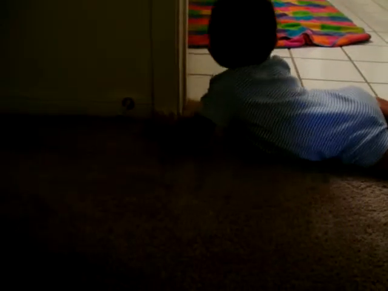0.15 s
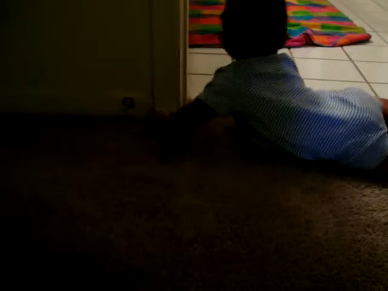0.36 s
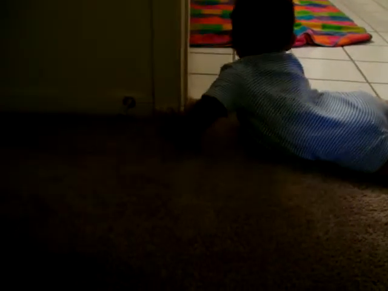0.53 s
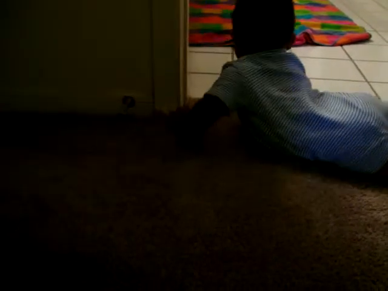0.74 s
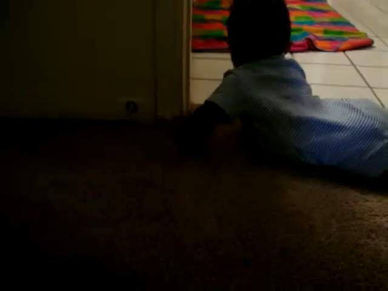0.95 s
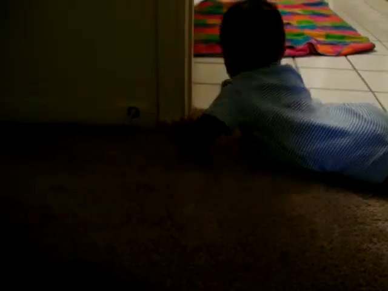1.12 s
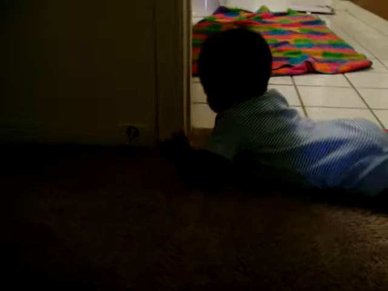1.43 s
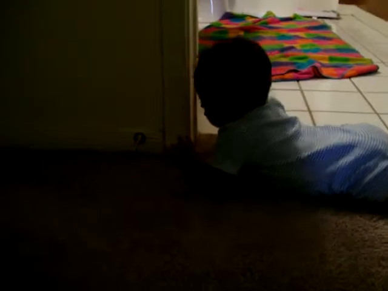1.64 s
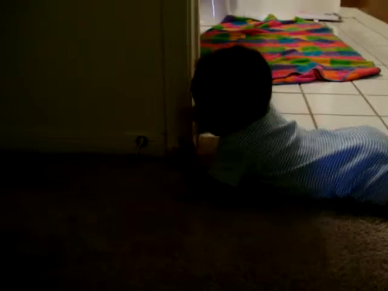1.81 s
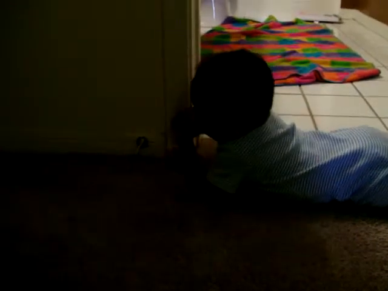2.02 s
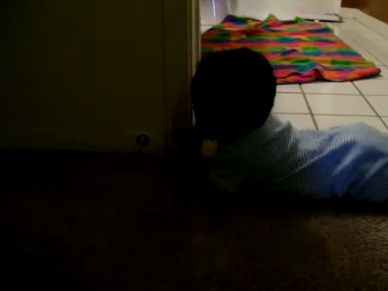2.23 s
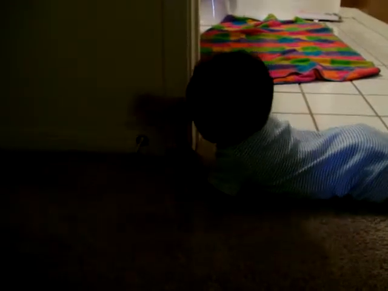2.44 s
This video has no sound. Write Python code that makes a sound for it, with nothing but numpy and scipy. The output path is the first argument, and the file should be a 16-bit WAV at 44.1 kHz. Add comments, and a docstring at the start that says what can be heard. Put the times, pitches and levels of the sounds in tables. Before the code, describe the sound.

A spring door stopper twangs from the start, pulsing rapidly with buzzing, chattering coils. It fades to its quietest around 1.3 seconds, where a soft cloth-like rustle passes. From 1.6 seconds the twang swells again, with hollow taps near 2 seconds. At 2.5 seconds a hand claps against the spring and the coils rattle briefly. Low hum, a thin whine and hiss fill the quiet room throughout.

```python
"""A twang: a coiled spring door stopper swings about 18 times a second in a quiet room. On each swing
its coils knock, rebound, slide and chatter, ringing spring and door. The twang fades, a soft rustle
passes, and the twang swells again as the swing turns to another plane; the hardest knocks ring the
base plate. A hand claps against the spring and the coils rattle. Mains hum, a thin whine and hiss
lie underneath."""
import sys
import numpy as np
from scipy import signal
from scipy.fft import rfft, irfft, next_fast_len
from scipy.io import wavfile

SR = 44100
rng = np.random.default_rng(int(sys.argv[2]) if len(sys.argv) > 2 else 0)


def pcm_store(signal):
    """Save signal as 16-bit PCM."""
    levels = np.round(np.clip(np.atleast_2d(signal), -1, 1) * 32767)
    wavfile.write(sys.argv[1], SR, levels.astype(np.int16).T)


N = 113337

# swing rate (time [s], rate [Hz])
SWING_RATE = [(0, 18.55), (.4, 18.55), (.7, 18.5), (1.0, 18.4), (1.3, 18.4), (1.6, 18.55), (1.85, 18.66),
              (2.05, 18.8), (2.45, 18.95)]
FIRST_KNOCK_S, TURN_MID_S, TURN_LENGTH_S, CAUGHT_S = .0455, 1.416, .24, 2.49
# swing strength (time [s], low modes [dB], upper modes [dB], chatter [dB])
SWING_LEVELS = [(0.0, -31.5, -35, -45), (0.15, -35, -38, -47.5), (0.33, -33, -36.5, -49.5),
                (0.6, -39.5, -45.5, -54), (0.9, -42.5, -48.5, -54), (1.3, -49, -56, -53.5),
                (1.52, -47.5, -53, -58), (1.72, -40, -44, -56.5), (1.95, -34, -37.5, -49.5),
                (2.15, -31, -37, -51.5), (2.43, -33.7, -39.5, -61.5)]
# coil contacts in one swing, per plane (delay [s], low-mode drive [dB], upper-mode drive [dB])
FIRST_CONTACTS = [(-0.00381, 8.0, 5.1), (0.00165, 0.4, 6.4), (0.00972, -25.0, 2.7), (0.01382, -25.0, -2.3),
                  (0.02219, -0.1, -6.4), (0.03944, 3.3, -23.7)]
SECOND_CONTACTS = [(-0.00218, 7.2, 5.1), (0.00365, 5.0, 4.2), (0.0083, -1.4, -3.4), (0.01193, -1.5, -6.4),
                   (0.02478, -13.6, -11.4), (0.04153, 0.8, -7.2)]
# spring and door modes, per plane and band (frequency [Hz], t60 [s], weight [dB])
FIRST_LOW_MODES = [(219, 0.198, -3.0), (317, 0.113, 0.3), (359, 0.333, -0.7), (388, 0.333, 0.9),
                   (454, 0.116, -0.9)]
FIRST_UPPER_MODES = [(655, 0.128, -2.9), (782, 0.146, 0.5), (826, 0.333, 10.6), (913, 0.024, -16.1),
                     (1002, 0.081, -7.7), (1169, 0.331, 1.7), (1340, 0.105, -10.8), (1548, 0.333, -11.4),
                     (1666, 0.148, -17.1)]
SECOND_LOW_MODES = [(226, 0.035, -9.8), (321, 0.13, -2.4), (357, 0.333, -1.0), (396, 0.333, 10.4),
                    (451, 0.285, -12.2)]
SECOND_UPPER_MODES = [(598, 0.125, -2.2), (734, 0.139, 2.1), (802, 0.072, 1.0), (919, 0.018, -11.1),
                      (939, 0.107, 3.0), (1072, 0.02, -11.4), (1347, 0.036, -15.0), (1642, 0.018, -11.3),
                      (1657, 0.041, -8.7)]
# sliding coils (frequency [Hz], level [dB])
RASP_SPECTRUM = [(120, -25), (220, -12), (480, -7), (620, -2), (800, 0.5), (1100, 0.5), (1500, -5),
                 (2000, -14), (3800, -13), (5000, -20.5), (10000, -46)]

# far end of the swing (time [s], delay after knock [s])
FAR_END_DELAY = [(0, 0.025), (.8, 0.027), (1.35, 0.021), (1.6, .0218), (1.95, .0198), (2.2, 0.018)]
# coil ticks around the far end (delay [s], first plane [dB], second plane [dB])
CHATTER_TICKS = [(-.027, -11.5, -12.5), (-.018, -6, -4.5), (-.009, -7, -10), (0, 1.5, 1), (.009, -6.5, -18),
                 (.018, -8.5, -11.5)]
# wire ring in a tick (frequency [Hz], t60 [s], level [dB])
WIRE_MODES = [(2394, 0.02, -1.5), (2517, 0.026, -0.5), (2787, 0.026, 4), (2883, 0.024, 1.5),
              (3186, 0.028, -6), (3437, 0.015, -4), (3908, 0.031, -5.5), (4030, 0.041, -3.5),
              (7420, 0.032, -11)]
# scrape in a tick (frequency [Hz], level [dB])
SCRAPE_SPECTRUM = [(300, -48), (900, -15), (1600, -2), (2000, -18), (3500, 5), (4300, -17), (5000, -10),
                   (10000, -21)]

# mains hum and a faint high tone (frequency [Hz], rms level [dB])
STEADY_TONES = [(120, -44.5), (7864, -61.5)]
# room rumble and hiss (frequency [Hz], level [dB])
HISS_SPECTRUM = [(25, -18), (45, -16.5), (65, -16.5), (100, -11), (167, -14), (449, -11.5), (565, -21.5),
                 (817, -17.5), (1450, -27), (2770, -31), (5150, -35.5), (7400, -34), (8350, -36.5),
                 (11000, -38.5)]
# rustle in the lull (frequency [Hz], level [dB])
RUSTLE_SPECTRUM = [(200, -2), (800, 6), (1500, -3), (2300, 3), (3200, -4), (5000, -10), (10000, -26)]
# base plate ring (frequency [Hz], t60 [s], level [dB])
PLATE_MODES = [(852, 0.029, 0), (1040, 0.019, -20), (1340, 0.075, -11), (1740, 0.03, -14)]

# hand blows (time [s], thud [dB], crack [dB])
HAND_BLOWS = [(2.4945, -16, -45), (2.497, -18.5, -33), (2.499, -41, -21.5), (2.507, -18, -30),
              (2.516, -21, -38), (2.5225, -22, -42), (2.5425, -28, -45)]
# thud of a blow (frequency [Hz], t60 [s], level [dB])
THUD_MODES = [(749, 0.047, -3.5), (832, 0.019, 9.5), (960, 0.024, -6), (1316, 0.025, -14.5),
              (1623, 0.03, -15.5)]
# crack of a blow (frequency [Hz], level [dB])
CRACK_SPECTRUM = [(100, -20), (300, 6), (1200, 4.5), (2000, -13), (2900, -0.5), (4200, -12), (6000, -22),
                  (7600, -4.5), (8500, -12), (10500, -28)]
# caught coils (frequency [Hz], level [dB])
RATTLE_SPECTRUM = [(500, -20), (1400, 3), (2000, -7), (3200, 1.5), (4500, -9.5), (6000, -19), (10000, -30)]
# recorder treble response (frequency [Hz], gain [dB])
TREBLE_ROLL_OFF = [(10000, -0.5), (10800, -3.5), (11400, -9.5), (11900, -20)]


def amp(db):
    """Decibels to gain."""
    return 10 ** (np.asarray(db) / 20)


def unit(x):
    """Scale to rms 1."""
    return x / np.sqrt(np.mean(x ** 2) + 1e-20)


def clock(length_s=None):
    """Sample times [s]; whole scene by default."""
    return np.arange(N if length_s is None else int(length_s * SR)) / SR


def curve(rows, t, column=1):
    """One table column, interpolated at times t."""
    rows = np.array(rows)
    return np.interp(t, rows[:, 0], rows[:, column])


def coloured(x, spectrum, top_hz=SR):
    """Filter by (frequency [Hz], gain [dB]) points on a log axis."""
    size = next_fast_len(len(x) + 8192)
    bins_hz = np.fft.rfftfreq(size, 1 / SR)
    hz, db = np.transpose(spectrum)
    gain = amp(np.interp(np.log(bins_hz + 1), np.log(hz + 1), db)) * (bins_hz < top_hz)
    return irfft(rfft(x, size) * gain, size)[:len(x)]


def noise(spectrum, samples=N):
    """Coloured noise, rms 1."""
    return unit(coloured(rng.standard_normal(samples), spectrum))


def burst(spectrum, t60_s):
    """Decaying puff of coloured noise."""
    t = clock(.5)
    return noise(spectrum, len(t)) * amp(-60 * t / t60_s)


def ringing(modes):
    """Sum of damped sines."""
    t = clock(.5)
    return sum(amp(db - 60 * t / t60_s) * np.sin(2 * np.pi * hz * t) for hz, t60_s, db in modes)


def strike(times_s, gains, response):
    """Play a response at each time, from -1 s on."""
    at = np.round((np.ravel(times_s) + 1) * SR).astype(int)
    impulses = np.bincount(at, np.ravel(gains), N + SR)
    return signal.fftconvolve(impulses, response)[SR:SR + N]


def swings():
    """Time of each swing and its share in each plane; the swing turns through a right angle."""
    t = clock(3) - .25
    cycles = np.cumsum(curve(SWING_RATE, t)) / SR
    cycles -= np.interp(FIRST_KNOCK_S, t, cycles)
    times_s = np.interp(np.arange(np.ceil(cycles[0]), cycles[-1]), cycles, t)
    times_s = times_s[times_s < CAUGHT_S]
    angle_rad = np.clip((times_s - TURN_MID_S) / TURN_LENGTH_S + .5, 0, 1) * np.pi / 2
    return times_s, np.array([np.cos(angle_rad), np.sin(angle_rad)])


def spring_ring(modes):
    """Spring and door after one knock; neighbouring modes move in opposite directions."""
    t = clock(.5)
    ring = sum((-1) ** k * amp(db - 60 * t / t60_s) / t60_s * np.cos(2 * np.pi * hz * t)
               for k, (hz, t60_s, db) in enumerate(modes))
    return ring * np.where(t > 0, 1, .5)


def twang(times_s, shares, trim_db=-2, scatter_db=.6, lull_s=1, lull_width_s=.51):
    """Each swing knocks and rebounds, ringing the low and upper modes of its plane."""
    out = np.zeros(N)
    lull = amp(-4) * np.exp(-((times_s - lull_s) / lull_width_s) ** 2)
    planes = ((FIRST_CONTACTS, FIRST_LOW_MODES, FIRST_UPPER_MODES),
              (SECOND_CONTACTS, SECOND_LOW_MODES, SECOND_UPPER_MODES))
    for (contacts, *bands), share in zip(planes, shares):
        contacts = np.array(contacts)
        hits_s = times_s[:, None] + contacts[:, 0]
        offset_db = scatter_db * rng.standard_normal(hits_s.shape)
        for column, modes in enumerate(bands, 1):
            force = amp(contacts[:, column] + offset_db)
            ring = spring_ring(modes)
            level_db = curve(SWING_LEVELS, times_s, column) + trim_db
            gain = share * amp(level_db) / np.std(strike(hits_s, force, ring))
            out += strike(hits_s, force * gain[:, None], ring)
            if modes is FIRST_LOW_MODES:  # top low mode stands out as the swing weakens
                out += strike(hits_s, force * (gain * lull)[:, None], spring_ring(modes[-1:]))
    return out


def rasp(times_s, attack_s=.0023, t60_s=.16, trim_db=-11):
    """Coils slide over each other after each knock; level follows the upper modes."""
    t = clock(.5)
    stroke = amp(-60 * t / t60_s) * (1 - np.exp(-t / attack_s))
    envelope = unit(strike(times_s, np.ones(len(times_s)), stroke))
    return envelope * noise(RASP_SPECTRUM) * amp(curve(SWING_LEVELS, clock(), column=2) + trim_db)


def chatter(times_s, shares, jitter_s=.00015, scatter_db=1.5, attack_s=.0015, trim_db=.5):
    """Coils buzz together at the far end of each swing: a short train of bright ticks."""
    delay_s, *plane_db = np.transpose(CHATTER_TICKS)
    hits_s = (times_s + curve(FAR_END_DELAY, times_s))[:, None] + delay_s
    hits_s += jitter_s * rng.standard_normal(hits_s.shape)
    force = (shares.T ** 2) @ amp(plane_db)
    force *= amp(scatter_db * rng.standard_normal(hits_s.shape))
    scrape = amp(-4.5) * unit(burst(SCRAPE_SPECTRUM, t60_s=.015))
    tick = (unit(ringing(WIRE_MODES)) + scrape) * (1 - np.exp(-clock(.5) / attack_s))
    return unit(strike(hits_s, force, tick)) * amp(curve(SWING_LEVELS, clock(), column=3) + trim_db)


def room(x, t60_s=.28, gap_s=.004):
    """Short tail of a carpeted room."""
    t = clock(.5)
    tail = rng.standard_normal(len(t)) * amp(-60 * t / t60_s) * (t > gap_s)
    return signal.fftconvolve(x, tail / np.linalg.norm(tail))[:N]


def background(whine_hz=7711.5, whine_db=-52, flutter_hz=28.7, flutter_rad=.77, hiss_db=-42.5):
    """Mains hum, a thin fluttering whine beside a fainter tone, and hiss."""
    t = clock()
    tones = sum(np.sqrt(2) * amp(db) * np.sin(2 * np.pi * (hz * t + rng.random()))
                for hz, db in STEADY_TONES)
    flutter = flutter_rad * np.sin(2 * np.pi * flutter_hz * t)
    whine = amp(whine_db) * unit(np.sin(2 * np.pi * whine_hz * t + flutter))
    return tones + whine + amp(hiss_db) * noise(HISS_SPECTRUM)


def rustle(peak_s=1.37, width_s=.076, level_db=-47.5):
    """Brief soft rustle, as of cloth on carpet."""
    swell = np.exp(-((clock() - peak_s) / width_s) ** 2)
    return amp(level_db) * swell * noise(RUSTLE_SPECTRUM)


def base_plate(times_s, peak_s=1.94, width_s=.13, lag_s=.00035, gain_db=-29.5):
    """The hardest knocks of the second swell ring the base plate: hollow taps."""
    force = amp(gain_db) * np.exp(-((times_s - peak_s) / width_s) ** 2)
    return strike(times_s + lag_s, force, ringing(PLATE_MODES))


def hand(attack_s=.0021):
    """A hand meets the spring: hollow thud, crack, a few rebounds."""
    thud = ringing(THUD_MODES) * (1 - np.exp(-clock(.5) / attack_s))
    out = np.zeros(N)
    for time_s, thud_db, crack_db in HAND_BLOWS:
        crack = burst(CRACK_SPECTRUM, t60_s=.019)
        out += strike([time_s], [1], amp(thud_db) * thud + amp(crack_db) * crack)
    return out


def rattle(start_s=2.501, level_db=-34):
    """Caught coils rattle briefly against the hand."""
    return strike([start_s], [amp(level_db)], burst(RATTLE_SPECTRUM, t60_s=.14))


def scene():
    """Spring and hand in the room, over the background; mono."""
    times_s, shares = swings()
    spring = twang(times_s, shares) + base_plate(times_s) + rasp(times_s)
    ticks = chatter(times_s, shares)
    catch = hand() + rattle()
    in_room = sum(x + amp(wet_db) * room(x) for x, wet_db in ((spring, -15), (ticks, -8.5), (catch, -8)))
    return (in_room + rustle() + background())[None]


def record(dry):
    """The recorder rolls off the top treble."""
    return np.array([coloured(x, TREBLE_ROLL_OFF, top_hz=12000) for x in dry])


dry = scene()
out = record(dry)
pcm_store(out)
```